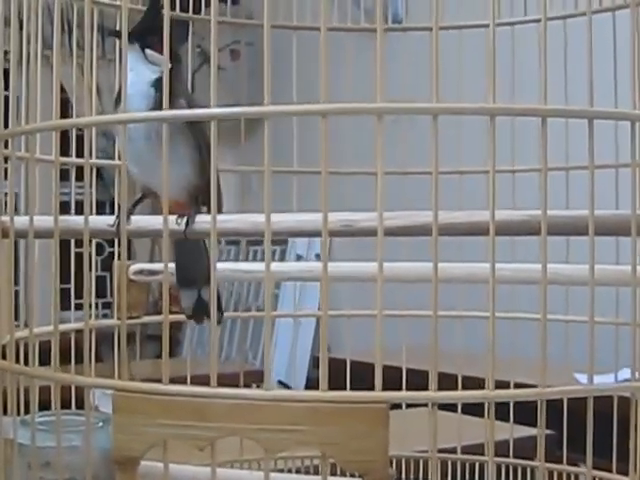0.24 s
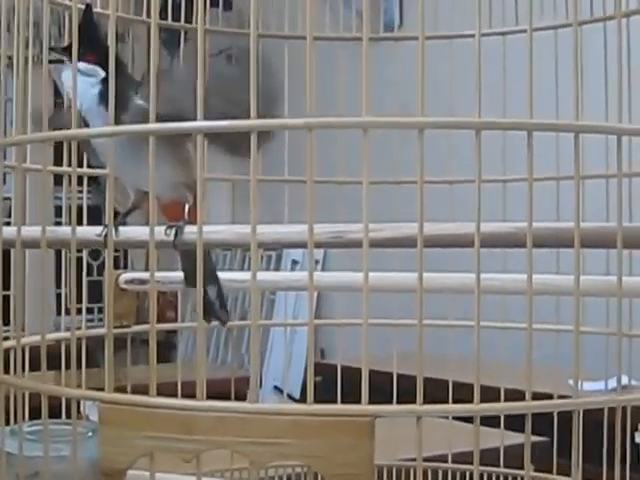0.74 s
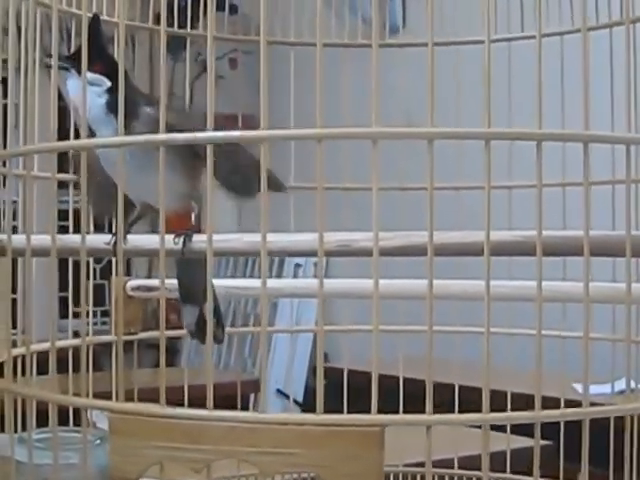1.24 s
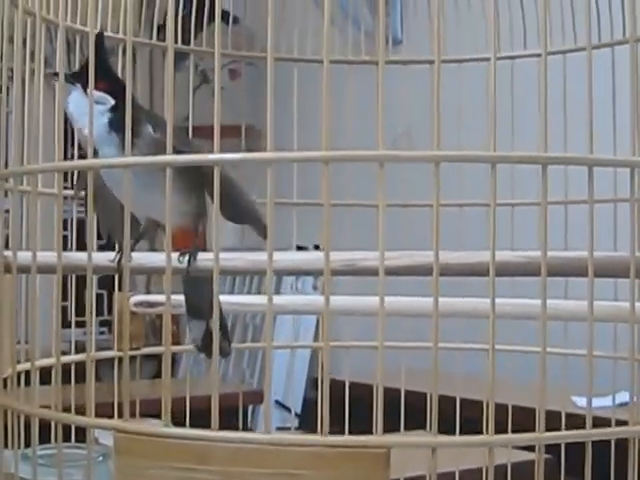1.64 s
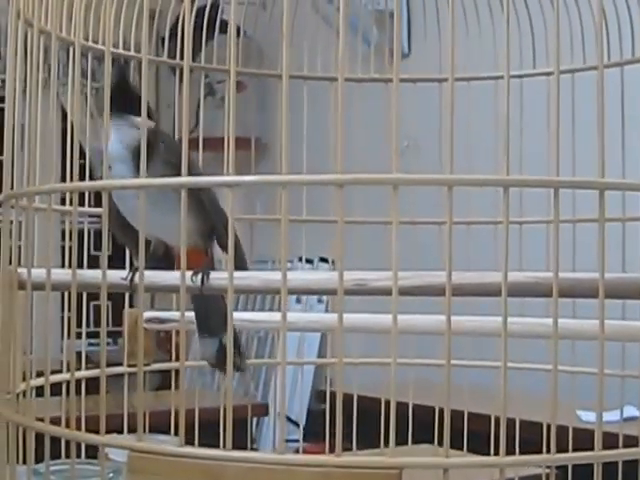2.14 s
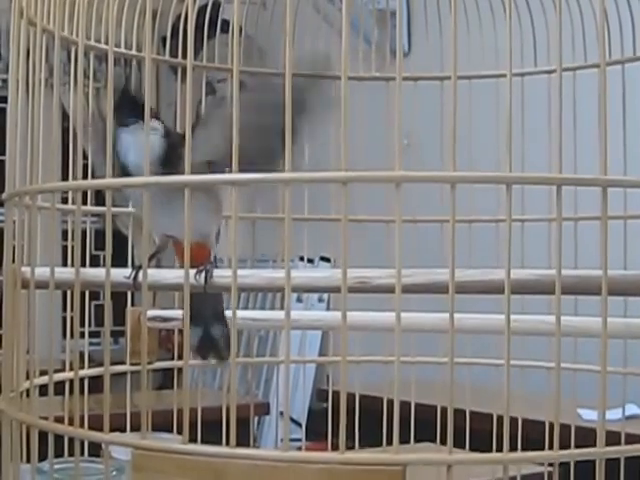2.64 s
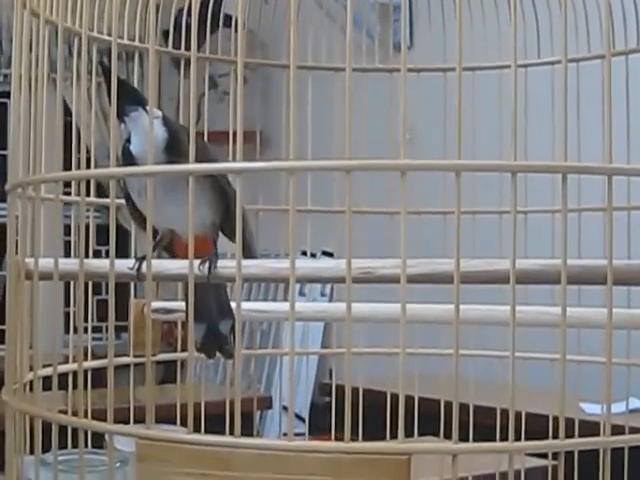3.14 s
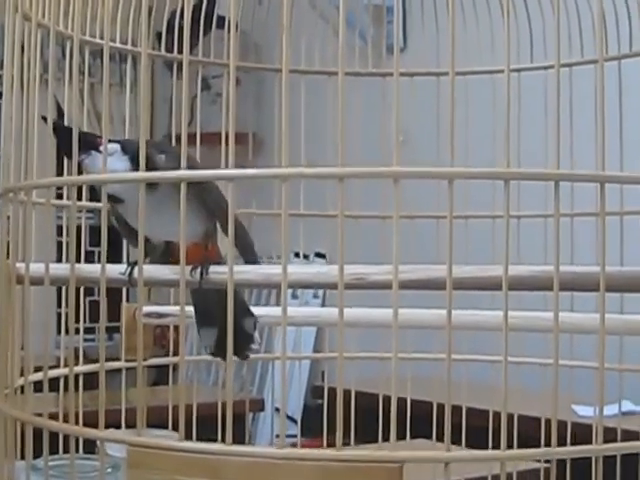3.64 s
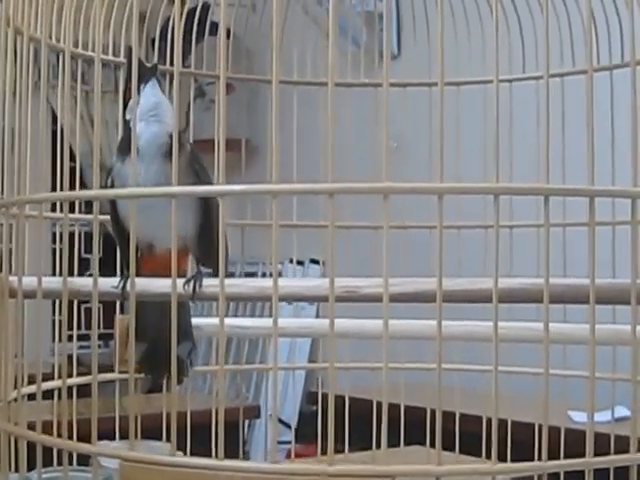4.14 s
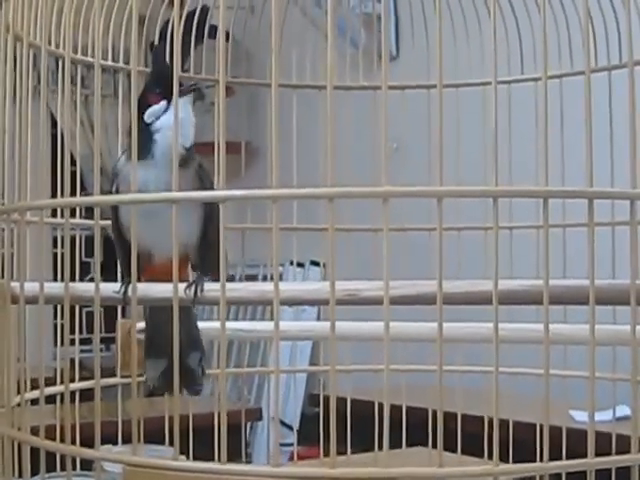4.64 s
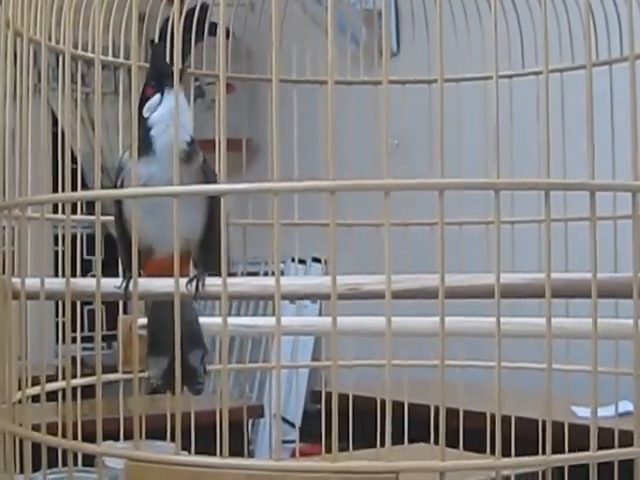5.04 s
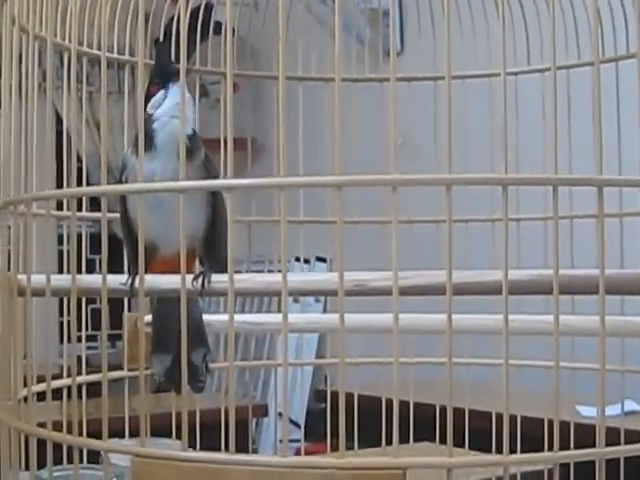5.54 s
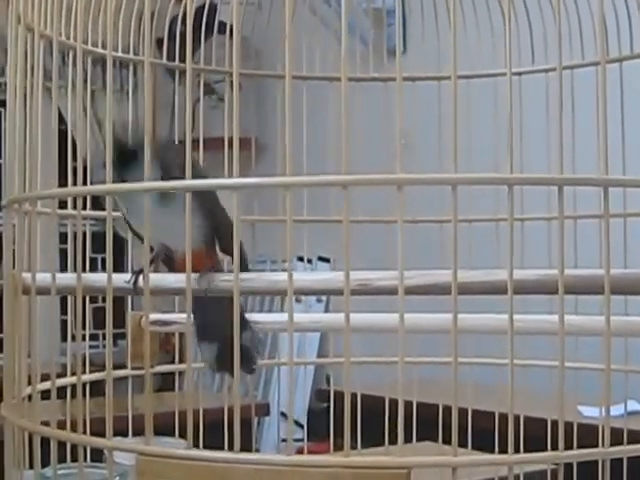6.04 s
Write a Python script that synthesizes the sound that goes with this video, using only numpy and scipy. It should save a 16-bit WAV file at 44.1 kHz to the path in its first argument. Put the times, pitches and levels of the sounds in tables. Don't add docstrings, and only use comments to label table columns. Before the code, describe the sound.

A caged songbird flutters, gives a harsh sliding call, then bursts into loud rich trilled whistles in a hard, echoing room.

```python
import sys
import numpy as np
from scipy import signal
from scipy.fft import rfft, irfft, next_fast_len
from scipy.io import wavfile
from scipy.ndimage import uniform_filter1d

SR = 44100
rng = np.random.default_rng(int(sys.argv[2]) if len(sys.argv) > 2 else 0)


def how_loud(loudness_db):
    steps = np.asarray(loudness_db, float) / 20
    return 10 ** steps


def bounce(signal):
    frames = np.transpose(np.atleast_2d(signal))
    limited = np.clip(frames, -1, 1)
    pcm = np.round(limited * 32767).astype(np.int16)
    wavfile.write(sys.argv[1], SR, pcm)


N = 277367


def evened(x):
    return x / np.sqrt(np.mean(x ** 2) + 1e-20)


def read(points, hz):
    f, value = np.transpose(points)
    return np.interp(np.log(hz + 1), np.log(f + 1), value)


def add(mix, start_s, sound):
    part = mix[round(start_s * SR):][:len(sound)]
    part += sound[:len(part)]


def wander(t, top_hz):
    f = np.geomspace(top_hz / 8, top_hz, num=8)[:, None]
    return np.sin(2 * np.pi * (f * t + rng.random((8, 1)))).sum(0) / 2


def noise(spectrum, patchy_db):
    frames, hz = N // 256 + 5, np.fft.rfftfreq(1024, 1 / SR)
    a, b, patches = rng.standard_normal((frames, 513, 3)).T
    patches = uniform_filter1d(patches, size=12, axis=0)
    patches = evened(uniform_filter1d(patches, size=14, axis=1))
    level_db = read(spectrum, hz)[:, None] + patchy_db * patches
    z = (a + 1j * b) * how_loud(level_db)
    return evened(signal.istft(z, nperseg=1024, noverlap=768)[1][:N])


def unroll(rows, edge_s):
    s, *columns = np.transpose(rows)
    t = np.arange(s[0], s[-1], 1 / SR)
    edges = np.clip(np.minimum(t - s[0], s[-1] - t) / edge_s, 0, 1)
    curves = [uniform_filter1d(np.interp(t, s, c), size=260, mode="nearest") for c in columns]
    return (t, np.sin(np.pi / 2 * edges) ** 2, *curves)


def whistle(trill_hz, depth, rows):
    # multiple, level_db
    overtones = [(2, -42.5), (3, -43.5), (4, -58.5), (5, -54.5), (6, -44.5)]
    slowing_per_s, sweep, waver, flutter_db = 1.437, .028, .004, 2.5
    t, edges, hz, db = unroll(rows, edge_s=.007)
    rate_hz = trill_hz * (1.15 - slowing_per_s * (t - t[0]))
    beat = 2 * np.pi * (np.cumsum(rate_hz) / SR + 0.657)
    depth = np.clip(depth, 0, 1) * (trill_hz > 0)
    puffs = 1 - depth + depth * 3.0 * ((1 + np.cos(beat)) / 2) ** 2
    bend = sweep * trill_hz / 120 * depth * np.sin(beat)
    hz = hz * (1 - bend + waver * wander(t, top_hz=71.3))
    turn = 2 * np.pi * np.cumsum(hz) / SR
    tone = np.sin(turn)
    for k, overtone_db in overtones:
        tone = tone + how_loud(overtone_db) * np.sin(k * turn) * (k * hz < SR / 2.2)
    level_db = db + flutter_db * wander(t, top_hz=51.48)
    return evened(tone * puffs) * how_loud(level_db) * edges


def note(row, trill_hz, depth, room_db, reach, bend, sag, swell_db, fade_db):
    start_s, length_s, first_hz, goal_hz, level_db = row
    u = np.linspace(0, 1, num=25)
    reach = np.clip(reach, .1, .99)
    after = np.maximum(u - reach, 0) / (1 - reach)
    hz = goal_hz + (first_hz - goal_hz) * np.maximum(1 - u / reach, 0) ** bend
    hz = hz * (1 - sag * (1 - np.exp(-after / .35)))
    db = level_db + swell_db * np.exp(-u / .34) + fade_db * u
    return trill_hz, depth, room_db, np.transpose([start_s + u * length_s, hz, db])


def song():
    # start_s, length_s, first_hz, goal_hz, level_db
    climbs_near = [
        (3.975, 0.13, 2350, 3339, -8.5),
        (4.31, .13, 2826, 3154, -17),
    ]
    climbs_mid = [
        (4.455, 0.14, 2641, 3627, -2.5),
    ]
    climbs_far = [
        (.818, 0.12, 2044, 2907, -28),
        (1.272, .058, 2070, 2720, -20),
        (6.19, 0.024, 1374, 1654, -21),
    ]
    climbs_distant = [
        (3.895, .075, 1660, 2800, -44),
        (5.8, .04, 2050, 2250, -50),
    ]
    arches = [
        (1.685, 0.13, 2135, 3173, -14.5),
        (6.09, .105, 2327, 2380, -12),
    ]
    long_arches = [
        (1.31, .26, 2060, 3000, -20),
    ]
    warbles = [
        (4.12, .07, 2637, 2180, -29),
        (4.18, 0.126, 2026, 2143, -26),
        (4.55, 0.14, 2240, 2600, -25),
        (4.59, .07, 2170, 2047, -27),
        (6.07, 0.029, 1767, 1650, -26.5),
    ]
    slow_warbles = [
        (5.864, .225, 2680, 2710, -16),
        (5.995, .075, 2310, 2170, -24),
    ]
    whistles_near = [(1.08, 0.13, 2205, 2290, -36.5), (4.748, .036, 1902, 1963, -13),
                     (5.026, 0.024, 3844, 3790, -15.5), (5.05, 0.02, 3813, 3770, -9.5),
                     (5.221, .036, 2520, 2470, -8), (5.222, 0.047, 3045, 3120, -13.5),
                     (5.826, .042, 2590, 2600, -13), (5.828, .078, 1960, 1950, -26),
                     (6.15, .045, 2200, 2130, -17), (6.15, .1, 1620, 1590, -30),
                     (6.224, .064, 2880, 2860, -12)]
    whistles_far = [
        (1.268, 0.019, 2070, 2045, -41),
        (1.51, 0.047, 1742, 1830, -40),
        (5.797, .02, 1900, 1944, -33),
        (6.213, 0.031, 2190, 2204, -24),
    ]
    steps = [
        (1.16, .14, 3385, 3480, -22.5),
        (4.355, 0.12, 3550, 3700, -24.5),
        (5.39, 0.072, 3010, 3059, -18),
        (5.39, .08, 2470, 2505, -21.5),
    ]
    leaps = [
        (4.925, .065, 1589, 3912, -4),
    ]
    hooks = [
        (5.122, .052, 1900, 2335, -5),
        (4.793, .062, 2213, 2760, -3),
        (5.926, .04, 1400, 1580, -28),
    ]
    domes = [
        (5.172, .055, 2442, 3128, -6.5),
    ]
    burrs = [
        (5.572, 0.11, 2900, 3400, -22.5),
        (6.08, 0.11, 2884, 2650, -21),
    ]
    kinds = [
        (climbs_near, dict(trill_hz=125, depth=.98, room_db=-2.5, reach=.99, bend=2.1, sag=0, swell_db=-3.5, fade_db=0)),
        (climbs_mid, dict(trill_hz=160, depth=1, room_db=-.3, reach=.99, bend=1.8, sag=0, swell_db=-7.2, fade_db=-4)),
        (climbs_far, dict(trill_hz=118, depth=1, room_db=6, reach=.8, bend=1.6, sag=.02, swell_db=-19.5, fade_db=-1.5)),
        (arches, dict(trill_hz=105, depth=1, room_db=-3, reach=.4, bend=1.4, sag=.11, swell_db=-3, fade_db=-7)),
        (steps, dict(trill_hz=100, depth=.81, room_db=.5, reach=.25, bend=2.2, sag=0, swell_db=-13, fade_db=-4.5)),
        (burrs, dict(trill_hz=140, depth=1, room_db=2, reach=.93, bend=2.5, sag=0, swell_db=1.5, fade_db=-4.5)),
        (climbs_distant, dict(trill_hz=129, depth=.97, room_db=24, reach=.9, bend=1.4, sag=0, swell_db=-16, fade_db=1.5)),
        (leaps, dict(trill_hz=91, depth=.94, room_db=-3, reach=.9, bend=1.05, sag=0, swell_db=-15, fade_db=-2.5)),
        (hooks, dict(trill_hz=100, depth=.75, room_db=-6, reach=.24, bend=1.1, sag=.11, swell_db=-5, fade_db=-8)),
        (domes, dict(trill_hz=121, depth=.55, room_db=-4.5, reach=.78, bend=3.2, sag=.2, swell_db=2.5, fade_db=1)),
        (long_arches, dict(trill_hz=130, depth=1, room_db=.8, reach=.42, bend=1.1, sag=.11, swell_db=-3, fade_db=-6)),
        (warbles, dict(trill_hz=140, depth=1, room_db=4, reach=.96, bend=1.7, sag=0, swell_db=-1, fade_db=-1.5)),
        (slow_warbles, dict(trill_hz=70, depth=.5, room_db=.6, reach=.4, bend=1.1, sag=0, swell_db=0, fade_db=-3)),
        (whistles_near, dict(trill_hz=0, depth=0, room_db=-6, reach=.9, bend=1.3, sag=0, swell_db=-3, fade_db=-1.5)),
        (whistles_far, dict(trill_hz=0, depth=0, room_db=6, reach=.71, bend=1.46, sag=0, swell_db=-16, fade_db=-8.5))]
    return [note(row, **kind) for table, kind in kinds for row in table]


def glides():
    # room_db, then rows of time_s, pitch_hz, level_db
    paths = [
        (-6.5, [(0.46, 4250, -51.5), (0.55, 4820, -40), (0.6, 5130, -31), (0.64, 5420, -35), (0.69, 6400, -40), (0.72, 6380, -34)]),
        (1, [(0.77, 4250, -53), (0.83, 4270, -55), (0.88, 4680, -49), (0.98, 5200, -51)]),
        (-3, [(2.315, 3100, -41), (2.33, 3950, -45), (2.365, 4480, -45), (2.377, 3900, -36)]),
    ]
    return [(0, 0, room_db, rows) for room_db, rows in paths]


def harsh(rows):
    # freq_hz, level_db
    throat = [(800, -28), (1500, -15), (2400, -3), (3300, -.5), (4500, -6), (7000, -15), (15000, -30)]
    vibrato_hz, vibrato_share = 135, 0.92
    t, edges, hz, db, depth, loss_db = unroll(rows, edge_s=0.0018)
    swing = vibrato_share * np.maximum(depth - .03, 0)
    hz = hz * (1 + swing * np.sin(2 * np.pi * vibrato_hz * t))
    turn = 2 * np.pi * np.cumsum(hz) / SR
    stack = 0
    for k in range(1, 9):
        level_db = read(throat, k * hz) - loss_db * k
        stack = stack + how_loud(level_db) * np.sin(k * turn) * (k * hz < SR / 2.2)
    rms = np.sqrt(uniform_filter1d(stack ** 2, size=300) + 1e-12)
    return stack / rms * how_loud(db) * edges


def slide():
    # time_s, pitch_hz, effort_db
    path = [
        (2.385, 1927, -30),
        (2.391, 2800, -23),
        (2.4, 3267, -25),
        (2.408, 2800, -21),
        (2.416, 1950, -20),
        (2.43, 1690, -30),
        (2.462, 1520, -30),
        (2.5, 1260, -19),
        (2.535, 1003, -24),
    ]
    rasp_hz, rasp_span_hz, rasp_depth = 1580, 150, .24
    bright_hz, bright_loss_db, dull_loss_db, effort_tilt = 1800, 1.5, 2.5, 1.4
    s, hz, db = np.transpose(path)
    depth = rasp_depth * np.clip((rasp_hz - hz) / rasp_span_hz, 0, 1)
    dull_db = dull_loss_db + effort_tilt * (db.max() - db)
    loss_db = np.where(hz > bright_hz, bright_loss_db, dull_db)
    return np.transpose([s, hz, db, depth, loss_db])


def chips():
    # start_s, length_s, first_hz, last_hz, level_db
    puffs = [
        (2.372, .013, 2270, 2210, -32.5),
        (2.588, 0.021, 1079, 1007, -26),
        (2.618, 0.031, 1584, 1800, -24),
        (2.642, .012, 2246, 2190, -17.5),
    ]
    calls = []
    for start_s, length_s, first_hz, last_hz, level_db in puffs:
        hz = np.linspace(first_hz, last_hz, num=3)
        s = start_s + length_s * np.array([0, .5, 1])
        db = level_db - 9.5 * np.array([1, 0, 1])
        loss_db = 13 * hz / 1000
        calls.append(np.transpose([s, hz, db, 0.11 + 0 * hz, loss_db]))
    return calls


def room(x):
    # freq_hz, t60_s
    decay = [(300, 1), (1500, 0.83), (3000, 0.72), (5000, 0.68), (10000, 0.79)]
    # delay_s, level_db
    echoes = [
        (.004, -6),
        (.031, -16),
        (.075, -10),
        (.15, -12),
    ]
    build_up_s = .085
    taps = np.zeros(SR)
    at = np.arange(200, SR - 20, 20)
    taps[at + rng.integers(0, 20, len(at))] = rng.choice([-1., 1.], len(at))
    hz, t, z = signal.stft(taps, SR, nperseg=256)
    z = z * how_loud(-60 * t / read(decay, hz)[:, None]) * np.clip(t / build_up_s, .2, 1)
    tail = signal.istft(z, SR, nperseg=256)[1]
    tail = tail / np.linalg.norm(tail)
    for delay_s, db in echoes:
        add(tail, delay_s, how_loud([db]))
    return signal.fftconvolve(x, tail)[:N]


def wings():
    # start_s, length_s, level_db
    beats = [
        (0.479, .37, -42),
        (0.868, 0.32, -34),
        (1.15, 0.33, -45),
    ]
    # freq_hz, width_hz, level_db
    cage = [
        (95, 24, -6),
        (250, 70, -.5),
    ]
    # freq_hz, level_db
    feathers = [(200, -30), (400, -.5), (900, -3), (1800, -7), (3000, -25)]
    rise_s, fade_db = 0.043, -15
    level = np.zeros(N)
    for start_s, length_s, db in beats:
        t = np.arange(0, length_s, 1 / SR)
        add(level, start_s, np.minimum(t / rise_s, 1) ** 2 * how_loud(db + fade_db * t / length_s))
    air = rng.standard_normal(N)
    booms = np.zeros(N)
    for hz, width_hz, db in cage:
        band_hz = [hz - width_hz / 2, hz + width_hz / 2]
        sos = signal.butter(2, band_hz, "band", fs=SR, output="sos")
        booms += how_loud(db) * evened(signal.sosfilt(sos, air))
    rustle = how_loud(-8) * noise(feathers, patchy_db=1.5)
    return uniform_filter1d(level, size=600) * (evened(booms) + rustle)


def brushes():
    # start_s, length_s, level_db
    strokes = [
        (0.254, 0.16, -53),
        (1.189, 0.17, -42),
        (2.152, 0.16, -47.5),
        (2.438, 0.18, -45.5),
        (2.585, 0.16, -39.5),
        (3.111, 0.0056, -49.5),
        (3.757, 0.01, -61),
    ]
    # freq_hz, level_db
    colour = [(150, -16.5), (400, 0), (900, -4), (2500, -2.5), (6000, -16), (15000, -24)]
    level = np.zeros(N)
    for start_s, length_s, db in strokes:
        add(level, start_s, how_loud(db) * signal.windows.tukey(round(length_s * SR), .6))
    return level * noise(colour, patchy_db=4.0)


def hums():
    # start_s, end_s, pitch_hz, level_db
    tones = [
        (3.6, 3.72, 490, -56),
        (3.79, 3.96, 490, -50),
        (3.05, 3.15, 1375, -56),
        (3.22, 3.34, 1375, -57),
    ]
    out = np.zeros(N)
    for start_s, end_s, hz, db in tones:
        t = np.arange(0, end_s - start_s, 1 / SR)
        add(out, start_s, how_loud(db) * np.sin(2 * np.pi * hz * t) * signal.windows.tukey(len(t), .4))
    return out


def murmur():
    # freq_hz, level_db
    air = [(18, -31), (30, -27.5), (141, -5), (486, -3.5), (554, -4.5), (760, -3.5), (1280, -10),
           (1390, -5.5), (1910, -13.5), (2750, -14), (7870, -24), (13300, -25.5), (16000, -26)]
    return how_loud(-47.5) * noise(air, patchy_db=1.6)


def scene():
    direct, walls = np.zeros(N), np.zeros(N)
    for trill_hz, depth, room_db, rows in song() + glides():
        tune = whistle(trill_hz, depth, rows)
        direct_db = -max(room_db, 0) * (trill_hz > 0)
        add(direct, rows[0][0], tune * how_loud(direct_db))
        add(walls, rows[0][0], tune * how_loud(room_db))
    for rows in [slide()] + chips():
        call = harsh(rows)
        add(direct, rows[0][0], call)
        add(walls, rows[0][0], how_loud(-7.0) * call)
    earlier = whistle(105, 1.0, [(0, 2070, 18.5), (.03, 2030, -33)])
    add(walls, 0, how_loud(-45) * earlier)
    return (direct + room(walls) + wings() + brushes() + hums() + murmur())[None]


def gain_control(x):
    threshold_db, squeeze, lag_s = -18.0, 1.1, .02
    memory = np.exp(-1 / (lag_s * SR))
    power_db = 10 * np.log10(signal.lfilter([1 - memory], [1, -memory], x ** 2) + 1e-12)
    over_db = np.maximum(power_db - threshold_db, 0) * squeeze
    return x / how_loud(signal.lfilter([1 - memory], [1, -memory], over_db))


def overload(whole):
    # multiple, level_db
    overtones = [(2, -33), (3, -30.5), (4, -43), (5, -33), (6, -39)]
    size = np.minimum(abs(whole), 1.06 * uniform_filter1d(abs(whole), size=1500))
    return sum(how_loud(db) * size ** 1.234 * np.cos(k * np.angle(whole)) for k, db in overtones)


def electronics(x):
    # freq_hz, level_db
    grit = [(200, -14.5), (2000, 12), (6000, 15), (10000, -31.5), (15000, -41.5)]
    rumble = [(20, -12.5), (60, 4), (120, -1), (300, -19), (16000, -51.5)]
    loudness = np.sqrt(abs(uniform_filter1d(x ** 2, size=200)))
    return how_loud(-34) * loudness * noise(grit, patchy_db=-1.0) + how_loud(-72) * noise(rumble, patchy_db=0.0)


def top_cut(x):
    return signal.sosfilt(signal.butter(12, 16510, fs=SR, output="sos"), x)


def record(dry):
    # freq_hz, level_db
    overload_colour = [(3000, 25.5), (5500, -31.5), (7000, -22.5), (9000, -10.5), (10500, 0.5),
                       (13500, -6.5), (16000, -9)]
    notch_hz, notch_width_hz, notch_db, edge_hz, overload_db = 7970, 350, -20, 15850, 8
    ducked = gain_control(dry[0])
    whole = signal.hilbert(ducked, next_fast_len(N))[:N]
    ducked = ducked / np.sqrt(1 + abs(whole / .9) ** 4)
    gritty = ducked + electronics(ducked)
    hz = np.fft.rfftfreq(N, 1 / SR)
    notch = how_loud(notch_db * np.exp(-abs(hz - notch_hz) / notch_width_hz))
    colour = how_loud(read(overload_colour, hz) + overload_db)
    both = rfft(gritty) + rfft(overload(whole)) * colour
    mix = irfft(both * notch * (hz < edge_hz), N)[None]
    return top_cut(mix)


dry = scene()
out = record(dry)
bounce(out)
```